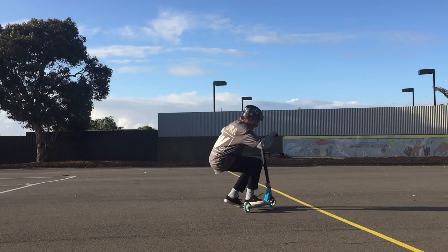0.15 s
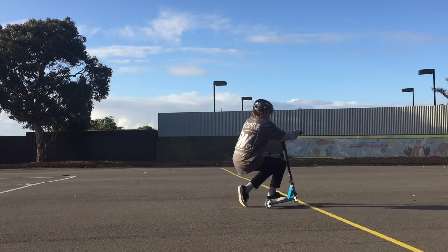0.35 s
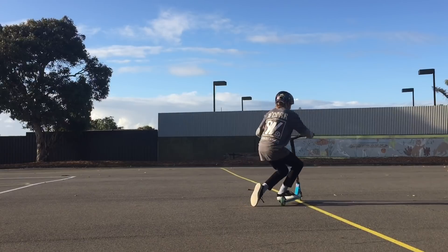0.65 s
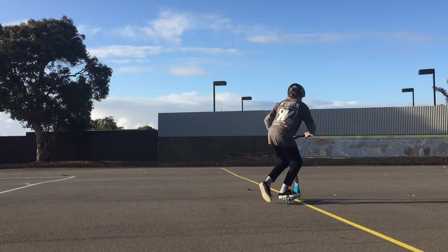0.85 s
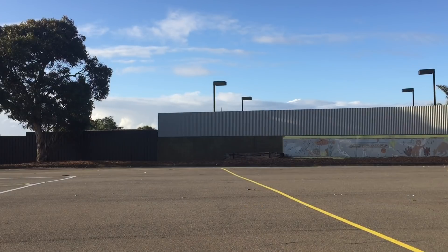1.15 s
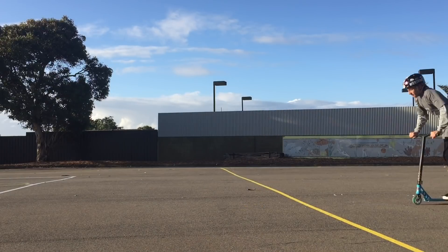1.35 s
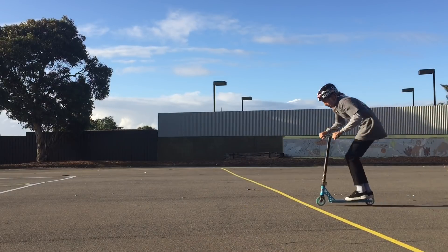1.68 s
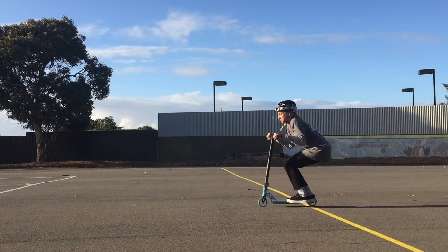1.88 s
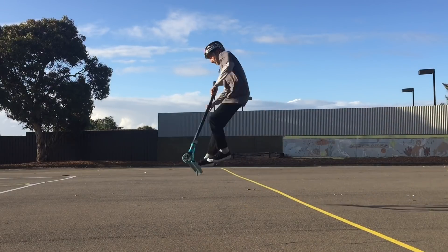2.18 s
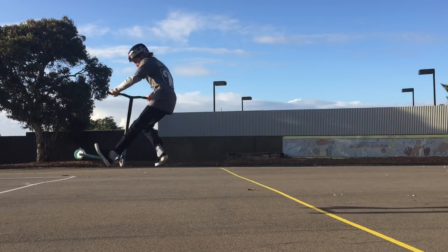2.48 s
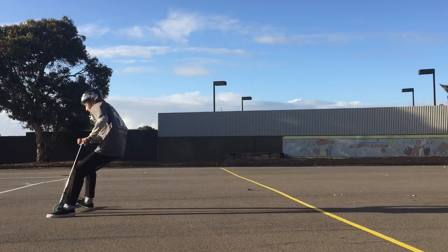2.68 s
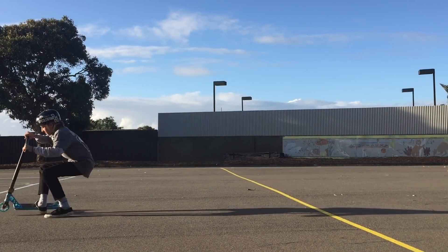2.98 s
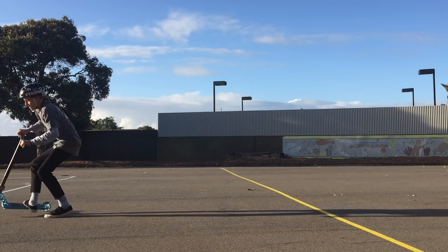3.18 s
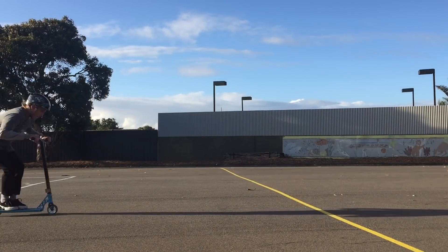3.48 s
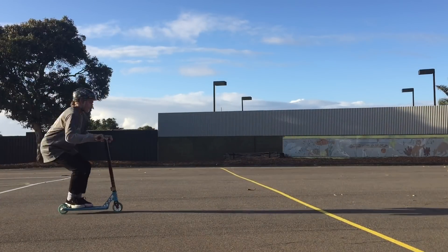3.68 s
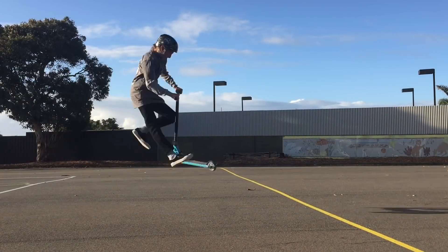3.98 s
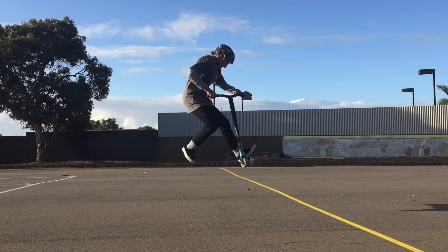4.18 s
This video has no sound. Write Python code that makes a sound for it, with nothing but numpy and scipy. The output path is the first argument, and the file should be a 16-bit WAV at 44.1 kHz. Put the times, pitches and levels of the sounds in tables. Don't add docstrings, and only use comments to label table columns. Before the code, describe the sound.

Three brief stunt scooter attempts outdoors: a heavy landing with grit crunch and a dying roar; a rolling approach full of loose clamp and deck rattle, a quiet airborne gap and another big slam; then faint rolling clatter, shoe scrape and a softer closing landing. Fences and walls return short dull echoes. The microphone stands some metres away, catching wind puffs and distant traffic.

```python
import sys
import numpy as np
from scipy import signal
from scipy.fft import rfft, irfft
from scipy.io import wavfile
from scipy.ndimage import uniform_filter1d

SR = 44100
rng = np.random.default_rng(int(sys.argv[2]) if len(sys.argv) > 2 else 0)


def put_to_file(sound):
    columns = np.atleast_2d(sound).T
    safe = np.clip(columns, -1, 1)
    whole_steps = np.round(safe * 32767)
    wavfile.write(sys.argv[1], SR, whole_steps.astype(np.int16))


def boost(x):
    u = np.asarray(x, float) / 20
    return 10 ** u


N = 191142

# (time [s], level [dB])
TRAFFIC_SWELL = [(0, 1.5), (.5, 1.5), (.85, -1.5), (1.15, 1), (1.6, -1.5), (2.1, 3), (2.5, -4), (2.8, -7),
                 (3.2, 3), (3.6, 3), (4.33, 1)]
# (frequency [Hz], density [dB per Hz])
RUMBLE_SPECTRUM = [(15, -34), (25, -13), (80, 3), (175, -4.5), (217, -5), (293, -4.5), (503, -12),
                   (659, -9.5), (1370, -16), (1890, -29.5), (2550, -30.5), (5430, -39.5), (8140, -46.5),
                   (11000, -50), (16000, -49.5)]
WIND_DB, LOW_DB, MID_DB = -49, -48.5, -48.5
WIND_FOLLOWS, LOW_FOLLOWS = 0.16, 0.27
# (time [s], level [dB])
GUSTS = [(.72, -41), (.94, -50), (1.1, -40), (1.4, -49), (1.58, -43.5), (1.7, -57), (1.81, -37.5),
         (2.15, -41.5), (2.4, -51), (2.63, -45.5), (2.84, -39)]
GUST_S = 0.054
# (time [s], low level [dB], mid level [dB], t60 [s])
ROARS = [
    (0, -42, -37, 0.19),
    (.16, -32, -28, 0.66),
    (2.6, -63, -42, 1),
    (2.844, -36, -24, .6),
]
ROAR_RISE_S = 0.042

# (delay [s], level [dB])
WALL_ECHOES = [
    (0.111, -30.5),
    (.14, -35),
    (0.291, -33.5),
]
# (frequency [Hz], t60 [s])
COURT_T60 = [(100, 0.86), (300, 0.35), (1000, 0.3), (2500, 0.2), (6000, 0.26), (14000, 0.1)]
# (frequency [Hz], level [dB])
COURT_COLOUR = [(60, -37), (250, -6.5), (900, -5), (2000, -4), (5000, -8), (15000, -3.5)]

# (time [s], length [s], level [dB], low edge [Hz])
SCUFFS = [(0.639, 0.0095, -66, 10000), (.748, .012, -67, 11000), (3.732, .008, -59, 9000),
          (3.903, 0.0069, -58, 6500), (3.945, 0.035, -54, 5500), (4.054, 0.049, -46, 3150),
          (2.316, 0.034, -56.5, 4500), (3.0, .012, -60, 8000), (3.052, .022, -59, 7000)]
# (time [s], length [s], frequency [Hz], level [dB])
SQUEAKS = [(1.154, 0.075, 4240, -67), (1.342, 0.057, 2970, -64.5), (1.388, 0.15, 2644, -63.5),
           (1.395, 0.083, 3210, -66.5), (1.477, 0.18, 2870, -63), (1.415, 0.087, 4800, -68),
           (1.898, 0.18, 3900, -66.5), (1.924, 0.14, 6050, -72), (2.07, 0.089, 4040, -69),
           (2.101, 0.13, 2810, -65), (2.31, 0.076, 4900, -69)]

# (time [s], level [dB])
DECK_ROLL = [(0, -27.5), (.08, -43.5), (.3, -40.5), (.87, -48.5), (1.1, -78.5), (1.5, -59), (1.63, -32),
             (1.9, -93), (2.2, -41.5), (2.6, -52), (2.67, -34), (2.9, -37.5), (3.2, -35), (3.4, -50.5),
             (3.53, -40), (3.67, -50), (3.98, -37), (4.33, -61)]
# (frequency [Hz], width [Hz], level [dB])
DECK_MODES = [(1197, 29, -7), (1538, 143, -0.9), (1770, 280, -1), (2566, 81, -9), (3020, 20, -33)]
# (frequency [Hz], width [Hz], level [dB])
CLAMP_MODES = [(3900, 200, -1), (4800, 59, 9.5), (5820, 160, 13.5), (6750, 270, 10.5), (7900, 190, -10),
               (8370, 100, 12), (9030, 190, 12.5)]
# (frequency [Hz], width [Hz], level [dB])
FIZZ_MODES = [(11000, 140, -4.5), (12300, 250, 2.5), (14400, 590, 0)]
# (start [s], clamp level [dB], fizz level [dB])
LOOSE_PARTS = [(0, -64, -72), (1.03, -57, -61), (1.65, -57, -56), (1.98, -62, -70), (2.4, -63, -75),
               (3.1, -78, -95), (3.3, -85, -82)]
CLAMP_UNDER_DECK_DB = -22.5
# (time [s], level [dB], loudest ring [Hz], rattle length [s])
KNOCKS = [(0.228, -32.5, 4420, 0.046), (0.709, -28, 3800, 0.007), (1.652, -28, 6830, 0.044),
          (1.675, -27.5, 6550, 0.0092), (1.6814, -30.5, 6640, .015), (1.729, -24.5, 6900, 0.015),
          (1.7403, -23, 4000, 0.0058), (1.7737, -23, 5950, 0.0098), (1.8044, -29.5, 6340, 0.014),
          (1.82, -34, 3900, .012), (2.206, -38.5, 8300, 0.015), (2.2206, -29, 3270, 0.0077),
          (2.2292, -31, 4030, 0.0073), (2.336, -44, 5040, 0.012), (2.6624, -31.5, 5800, 0.016),
          (2.94, -28.5, 3970, 0.019), (2.968, -38, 4070, 0.02), (2.99, -44, 3470, .0084),
          (3.256, -39, 5870, 0.01), (3.369, -40.5, 7900, .029), (3.399, -36.5, 7000, 0.033),
          (3.438, -38, 7600, 0.048), (3.461, -31.5, 4240, 0.019), (3.475, -32, 6580, 0.013),
          (3.4887, -34.5, 6600, 0.019), (3.51, -31, 6500, 0.011), (3.5674, -35, 6900, 0.012),
          (3.596, -48, 5780, .02), (3.609, -45, 4970, 0.017), (3.967, -33.5, 5730, 0.019)]
KNOCK_CLAMP_DB, KNOCK_FIZZ_DB = -1, -28
# (time [s], level [dB], loudest ring [Hz], fizz relative to tick [dB])
TICKS = [(.2876, -35.5, 8400, -21), (.336, -36, 4940, -27), (0.4227, -36.5, 4850, -21),
         (.453, -46, 3650, -24), (1.042, -40.5, 3960, -37.5), (1.1543, -38.5, 9130, -14),
         (1.232, -39, 9100, -12), (1.257, -46, 9000, -10), (1.277, -59, 4270, -19), (1.586, -41, 4800, -19),
         (1.5962, -22.5, 3730, -10.5), (1.607, -21.5, 6750, -23), (1.696, -19.5, 6840, -17),
         (1.75, -28, 6400, -23), (1.846, -37, 3920, -15), (1.873, -27.5, 3940, -13),
         (1.882, -37, 4000, -32), (1.915, -39, 4180, -10), (2.008, -44, 3900, -19),
         (2.11, -37.5, 3900, -17), (2.2594, -48, 4480, -18), (3.36, -43, 7200, -18),
         (3.403, -39, 4100, -32), (3.4984, -29.5, 3520, -34), (3.541, -39, 6800, -25),
         (3.755, -59, 3630, 0), (3.849, -40.5, 8150, -15), (3.885, -37.5, 5360, -32),
         (0.711, -44, 9350, -4), (4.088, -34.5, 3630, -14)]
TICK_DECK_DB, TICK_S = -14.5, 0.0099
# (start [s], gap [s], level [dB], ring [Hz])
SHAKES = [
    (1.36, .0225, -49, 5000),
    (1.459, .031, -45, 4860),
    (2.086, .022, -50, 8300),
]
SHAKE_GROW_DB = [2, -1.5, -0.5]

# (time [s], level [dB], start [Hz], end [Hz], length
THUMPS = [(0.258, -31, 905, 350, 2.5), (0.138, -1.5, 1320, 850, 1.19), (0.1519, -5, 1310, 357, 3.07),
          (0.1547, -4, 348, 157, 1.26), (2.572, -21, 330, 240, 3.05), (2.819, -25, 1310, 350, 3.2),
          (2.8337, 0.5, 1462, 480, 3.465), (2.834, -2.5, 462, 184, 1.34), (3.1244, -29, 796, 350, 2.35),
          (4.3034, -13.5, 590, 327, 1.8), (4.311, -18, 192, 109, 1.14), (4.3174, -13.5, 1760, 1450, 3.3)]
# (time [s], level [dB], hold [s], t60 [s], tilt [dB per octave])
CRUNCH = [(0.1356, -15.5, 0.016, 0.03, -6), (0.153, -37, 0.019, 0.16, 4), (2.5683, -34, 0.017, 0.039, -8.5),
          (2.579, -21, 0.0038, 0.025, -6), (2.585, -31.5, 0.04, 0.22, -5), (2.805, -47, 0.026, .03, -7.5),
          (2.815, -33.5, 0.0045, 0.042, -9.5), (2.832, -5, 0.0034, 0.028, -7.5),
          (2.836, -13.5, 0.0018, 0.053, -8), (4.3018, -30, 0.0045, 0.015, -7),
          (4.3079, -22.5, 0.005, 0.023, -7), (4.3162, -18, 0.0018, 0.09, -5.5)]
# (frequency [Hz], width [Hz], level [dB])
SLAM_MODES = [(924, 24, -7), (1450, 2100, 0.5), (3100, 330, -7), (4420, 1400, -9), (9600, 400, -18)]

# (time [s], fade out [s], fade in [s])
SCENE_CHANGES = [
    (1.031, 0.048, 0.031),
    (3.297, 0.048, 0.037),
]
# (frequency [Hz], level [dB])
TONE_RESPONSE = [(20, -34), (45, -9.5), (80, -2.16), (15750, 0.83), (16050, -24), (16500, -40)]


def evened(x):
    return x / np.sqrt(np.mean(x ** 2) + 1e-20)


def read(points, hz):
    f, value = np.transpose(points)
    return np.interp(np.log(hz + 1), np.log(f + 1), value)


def curve(rows, index):
    rows = np.array(rows)
    return np.interp(np.arange(N) / SR, rows[:, 0], rows[:, index])


def add(mix, s, sound):
    part = mix[round(s * SR):][:len(sound)]
    part += sound[:len(part)]


def band(x, lo_hz, hi_hz):
    sos = signal.butter(3, [lo_hz, min(hi_hz, SR / 2.1)], "band", fs=SR, output="sos")
    return signal.sosfilt(sos, x)


def ring(hz, width_hz):
    t = np.arange(2500) / SR
    x = np.exp(-np.pi * width_hz * t) * np.sin(2 * np.pi * hz * t)
    return x / np.linalg.norm(x)


def lumps(size, length_s, depth_db):
    width = int(length_s * SR)
    smooth = uniform_filter1d(uniform_filter1d(rng.standard_normal(size), width), width)
    return boost(depth_db * evened(smooth))


def chatter(per_s, spread_db):
    sizes = boost(spread_db * np.minimum(rng.exponential(1, N), 2.2))
    ticks = rng.standard_normal(N) * sizes * (rng.random(N) < per_s / SR)
    return evened(evened(ticks) + 0.31 * rng.standard_normal(N))


def town():
    frames, hz = N // 256 + 5, np.fft.rfftfreq(1024, 1 / SR)
    real, imag, patches = rng.standard_normal((frames, 513, 3)).T
    patches = evened(uniform_filter1d(uniform_filter1d(patches, 8, 0), 10, 1))
    spectrum = (real + 1j * imag) * boost(read(RUMBLE_SPECTRUM, hz)[:, None] + 2.2 * patches)
    rumble = signal.istft(spectrum, nperseg=1024, noverlap=768)[1][:N]
    below_130, below_400 = (signal.sosfiltfilt(signal.butter(2, edge_hz, fs=SR, output="sos"), rumble)
                            for edge_hz in (130, 400))
    t, swell_db = np.arange(N) / SR, curve(TRAFFIC_SWELL, index=1)
    wind = boost(WIND_DB + WIND_FOLLOWS * swell_db)
    for s, db in GUSTS:
        wind = wind + boost(db) * np.exp(-((t - s) / GUST_S) ** 2)
    low, mid = boost(LOW_DB + LOW_FOLLOWS * swell_db), boost(MID_DB + swell_db)
    for s, low_db, mid_db, t60 in ROARS:
        dying = np.clip((t - s) / ROAR_RISE_S + 0.5, 0, 1) * boost(-60 * np.maximum(t - s, 0) / t60)
        low, mid = np.hypot(low, boost(low_db) * dying), np.hypot(mid, boost(mid_db) * dying)
    return wind * evened(below_130) + low * evened(below_400 - below_130) + mid * evened(rumble - below_400)


def court(x, wet_db=-5):
    taps, count = np.zeros(SR), (SR - 301) // 20
    places = np.arange(300, SR - 20, 20) + rng.integers(0, 20, count)
    taps[places] = rng.choice([-1., 1.], count)
    taps *= lumps(SR, 0.01, depth_db=2.5)
    hz, t, z = signal.stft(taps, SR, nperseg=256)
    tail = signal.istft(z * boost(-60 * t / read(COURT_T60, hz)[:, None]), SR, nperseg=256)[1]
    tail *= np.minimum(np.arange(len(tail)) / SR / 0.0027, 1)
    tail *= boost(wet_db) / np.linalg.norm(tail)
    slap = band(np.arange(600) == 0, 124, 2500)
    for delay, db in WALL_ECHOES:
        add(tail, delay, boost(db) * slap / np.linalg.norm(slap))
    colour = boost(read(COURT_COLOUR, np.fft.rfftfreq(len(tail), 1 / SR)))
    tail = irfft(rfft(tail) * colour, len(tail))
    return signal.fftconvolve(x, tail)[:N]


def scuffs():
    out = np.zeros(N)
    for noise, (s, length, db, lo_hz) in zip(rng.standard_normal((len(SCUFFS), 3000)), SCUFFS):
        u = np.linspace(0, 1, int(length * SR))
        hiss = evened(band(noise, lo_hz, 18000))[:len(u)]
        add(out, s, boost(db) * hiss * np.sin(np.pi * u ** 2))
    return out


def squeaks():
    out = np.zeros(N)
    for noise, (s, length, hz, db) in zip(rng.standard_normal((len(SQUEAKS), 12000)), SQUEAKS):
        whistle = signal.oaconvolve(noise, ring(hz, 24.8))[2500:2500 + int(length * SR)]
        add(out, s, boost(db) * whistle * signal.windows.tukey(len(whistle), 0.6))
    return out


def jolts():
    rows = []
    for s, db, hz, length in KNOCKS:
        rows.append((s, db + KNOCK_CLAMP_DB, db, db + KNOCK_FIZZ_DB, hz, length))
    for s, db, hz, fizz_db in TICKS:
        rows.append((s, db, db + TICK_DECK_DB, db + fizz_db, hz, TICK_S))
    sizes = rng.standard_normal((len(SHAKES), 4))
    for (s, gap, db, hz), grow_db, size in zip(SHAKES, SHAKE_GROW_DB, sizes):
        levels_db = db + grow_db * np.arange(len(size)) + 1.5 * size
        for k, tick_db in enumerate(levels_db):
            rows.append((s + k * gap, tick_db, tick_db + TICK_DECK_DB, tick_db - 13, hz, TICK_S))
    return rows


def metal(level, modes, shared, lo_hz, hi_hz, broad):
    rings = np.zeros(N)
    for hz, width_hz, db in modes:
        rings += boost(db) * signal.oaconvolve(level * chatter(400, 5.3), ring(hz, width_hz))[:N]
    rings /= np.linalg.norm(boost(np.array(modes)[:, 2]))
    clicks = np.sqrt(SR / 2 / (hi_hz - lo_hz)) * band(level * shared, lo_hz, hi_hz)
    return rings + broad * clicks


def rattle():
    deck, blows = boost(curve(DECK_ROLL, index=1) - 15.0), jolts()
    stretches = np.array(LOOSE_PARTS)
    stretch = np.searchsorted(stretches[1:, 0], np.arange(N) / SR)
    _, clamp, fizz = boost(stretches[stretch].T - 18.5)
    clamp, fizz = uniform_filter1d(clamp, size=3000), uniform_filter1d(fizz, size=3000)
    clamp = clamp + boost(CLAMP_UNDER_DECK_DB) * deck
    own, grain = np.zeros(N), rng.standard_normal((len(blows), 4000))
    t = np.arange(4000) / SR
    knock = np.minimum(t / 0.0011, 1) * (1 + 1.1 * np.exp(-t / 0.00067))
    for noise, (s, clamp_db, deck_db, fizz_db, hz, length) in zip(grain, blows):
        dying = np.exp(-t / max(length, 0.001)) * knock
        add(deck, s, boost(deck_db - 8.5) * dying)
        add(clamp, s, boost(clamp_db - 18.5) * dying)
        add(fizz, s, boost(fizz_db - 7.5) * dying)
        struck = signal.oaconvolve(noise * dying, ring(hz, 300))
        add(own, s, boost(clamp_db - 14.0) * struck)
    shared = chatter(2500, 3.5)
    for s, *_ in blows:
        add(shared, s + 0.00066, np.full(1, 10.5))
    own += metal(deck, DECK_MODES, shared, lo_hz=790, hi_hz=3270, broad=0.55)
    own += metal(clamp, CLAMP_MODES, shared, lo_hz=3600, hi_hz=10000, broad=0.84)
    own += metal(fizz, FIZZ_MODES, shared, lo_hz=9800, hi_hz=15700, broad=0.98)
    return own


def thumps():
    out = np.zeros(N)
    for s, db, start_hz, end_hz, cycles in THUMPS:
        fall = np.log(start_hz / end_hz)
        u = np.linspace(0, 1, int(SR * cycles * fall / (start_hz - end_hz)))
        turns = np.cumsum(start_hz * np.exp(-fall * u)) / SR
        add(out, s, boost(db) * np.sin(2 * np.pi * turns) * signal.windows.tukey(len(u), 0.55))
    return out


def crunches():
    out, size = np.zeros(N), (len(CRUNCH), 16384)
    noise = rng.standard_normal(size) * boost(1.6 * np.minimum(rng.exponential(1, size), 4))
    noise *= lumps(size, 0.0049, depth_db=3.0)
    t, hz = np.arange(16384) / SR, np.fft.rfftfreq(16384, 1 / SR)
    deck = rfft(sum(boost(db) * ring(f, width_hz) for f, width_hz, db in SLAM_MODES), 16384)
    for grit, (s, db, hold, t60, tilt_db) in zip(noise, CRUNCH):
        tilt = boost(tilt_db * np.log2(hz / 1000 + 1.04)) * hz / (hz + 250)
        grit = evened(irfft(rfft(grit) * (tilt + 0.048 * deck)))
        envelope = boost(db - 60 * np.maximum(t - hold, 0) / t60) * np.minimum(t / 0.0011, 1)
        add(out, s, envelope * grit)
    return out


def scene():
    hits = thumps() + crunches()
    parts = rattle() + squeaks()
    echoes = court(hits + 0.7 * parts)
    return (hits + parts + echoes + town() + scuffs())[None]


def low_pass(x):
    return signal.sosfilt(signal.butter(12, 16540, fs=SR, output="sos"), x)


def record(dry):
    t = np.arange(N) / SR
    fade = np.ones(N)
    for s, out_s, in_s in SCENE_CHANGES:
        fade *= np.clip(np.maximum((s - t) / out_s, (t - s) / in_s), 0.01, 1)
    limited = dry / (1 + (dry / 1.18) ** 6) ** (1 / 6)
    heard = irfft(rfft(limited) * boost(read(TONE_RESPONSE, np.fft.rfftfreq(N, 1 / SR))), N)
    return low_pass(heard * fade)


dry = scene()
out = record(dry)
put_to_file(out)
```